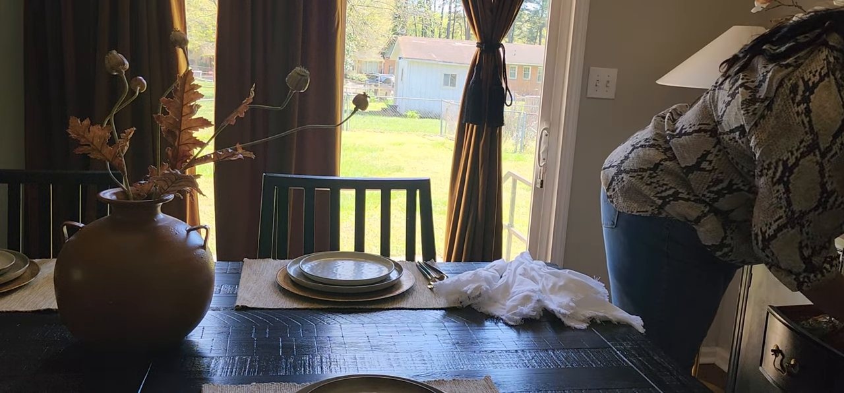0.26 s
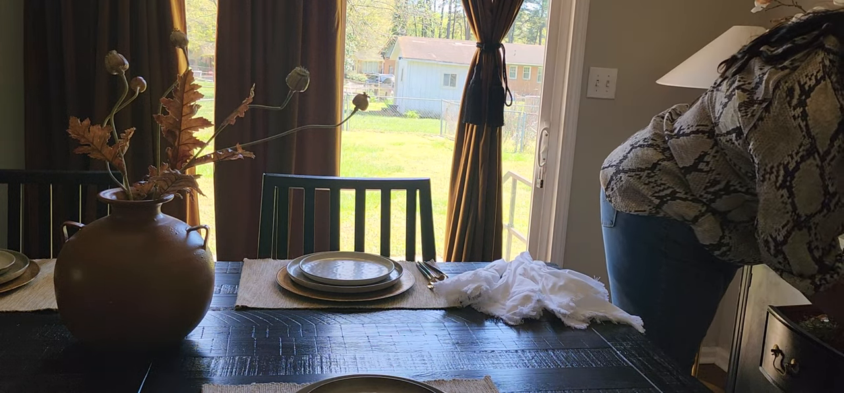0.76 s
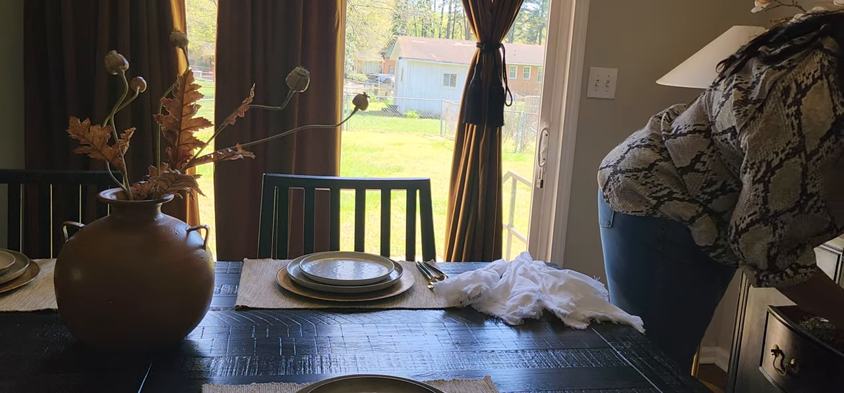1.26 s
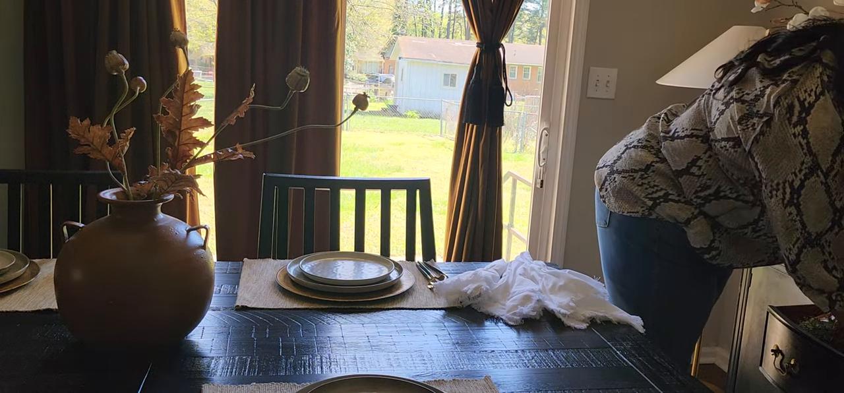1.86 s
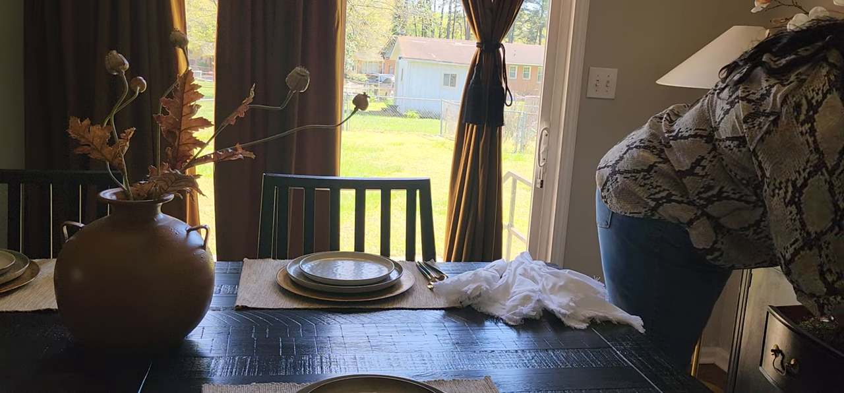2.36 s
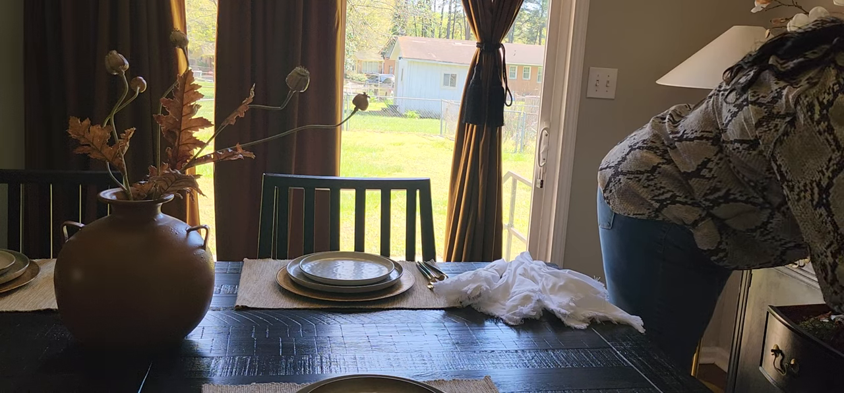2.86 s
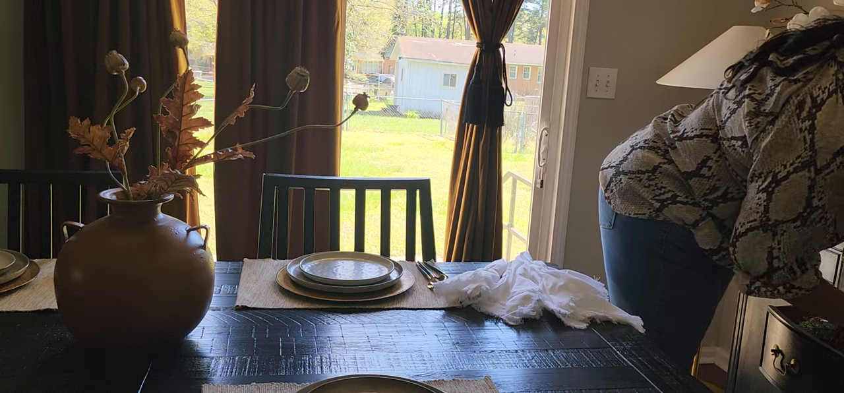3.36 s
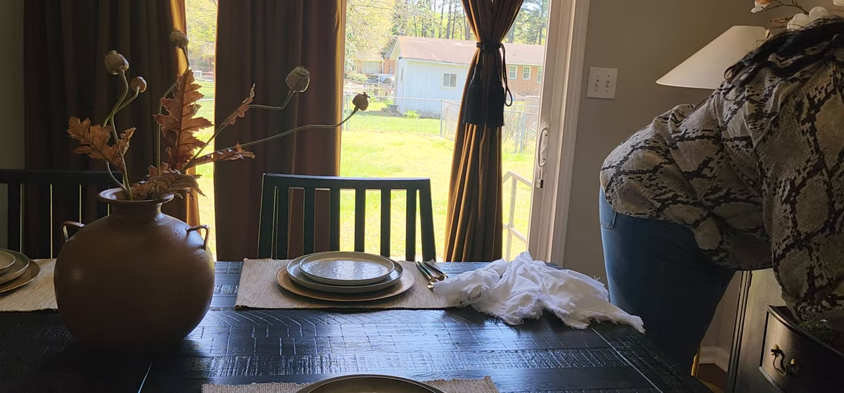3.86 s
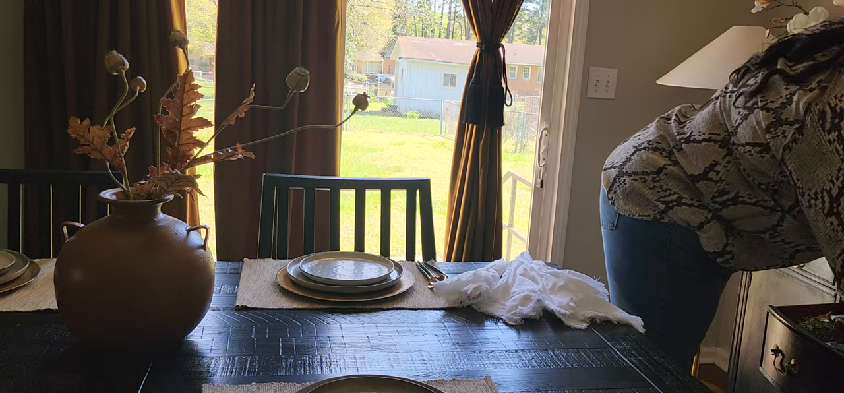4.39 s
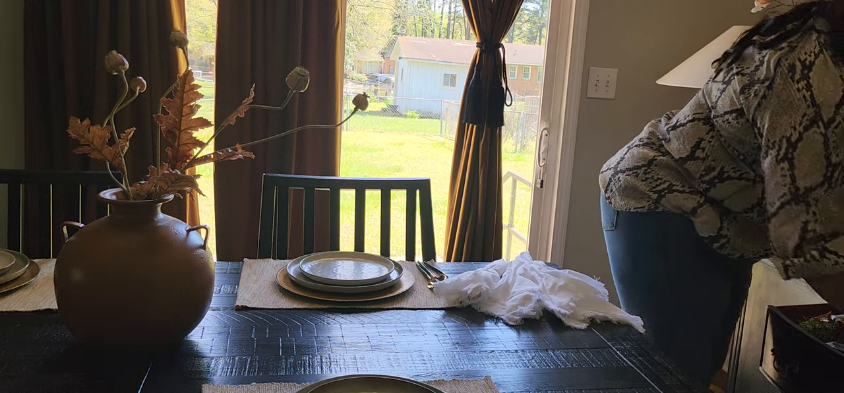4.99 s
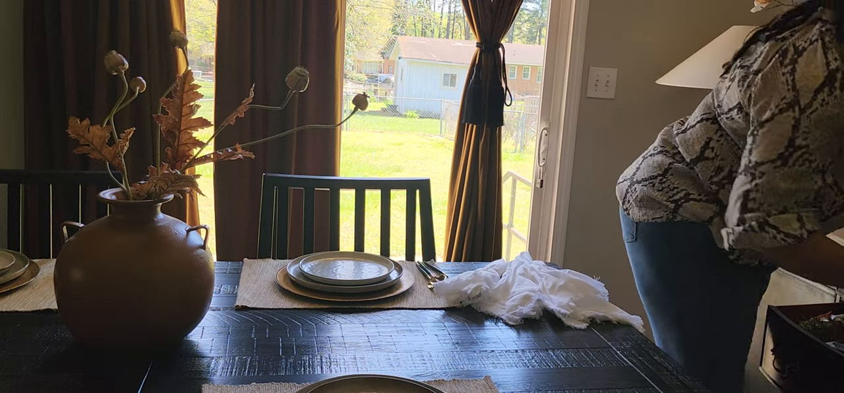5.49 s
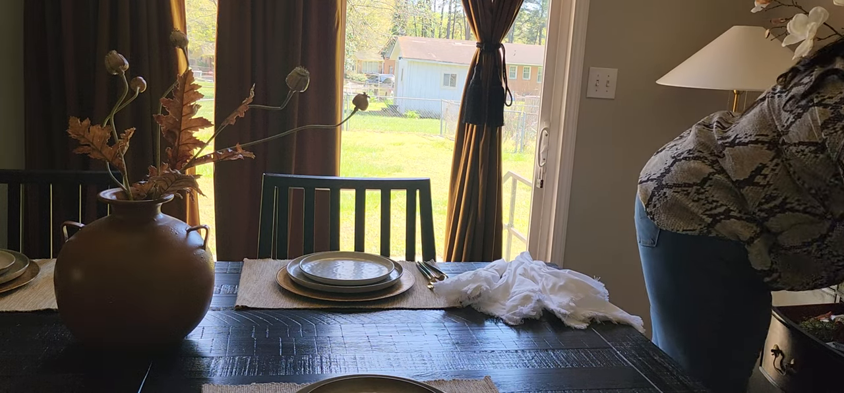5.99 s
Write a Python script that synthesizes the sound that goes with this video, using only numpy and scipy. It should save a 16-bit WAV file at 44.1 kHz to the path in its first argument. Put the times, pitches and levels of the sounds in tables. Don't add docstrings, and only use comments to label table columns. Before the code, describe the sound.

A quiet furnished dining room with low house rumble, faint hiss and short reverberation; a wooden drawer of forks sits a few metres away, slightly right. After a faint rustle, a bright, high fork clink with quick rebounds rings at 0.3 s, and wood bumps at 0.5. Near quiet, with a light drag and thin ringing around 1.15 and cloth rustle at 1.45. At 1.6 a fork drops with a duller clink and knock. Quiet again until 2.6, then forks drag and scrape, with a hard wooden bump at 2.85 and a faint panel groan. A firm knock and clink at 3.2 lead into irregular ticks and scrapes, thinning by 4.1. Bumps at 4.35-4.4 precede the loudest clattering snap at 4.5-4.6. A tiny clink follows at 4.8, then soft, dull footsteps from 4.9 to 5.75 with rustling sleeves and a faint creak at 5.4. A small rattling knock at 5.9 fades into quiet.

```python
import sys
import numpy as np
from scipy import signal
from scipy.fft import rfft, irfft
from scipy.io import wavfile
from scipy.ndimage import uniform_filter1d

SR = 44100
rng = np.random.default_rng(int(sys.argv[2]) if len(sys.argv) > 2 else 0)


def linear_from_db(decibels):
    return 10 ** (np.asarray(decibels, float) / 20)


def unload_audio(sound):
    columns = np.transpose(np.atleast_2d(sound))
    steps = np.round(np.clip(columns, -1, 1) * 32767)
    wavfile.write(sys.argv[1], SR, steps.astype(np.int16))


N = 275184

# start in seconds, ring level in dB, crack level in dB.
TINE_HITS = [
    (.2585, -44.5, -50),
    (.297, -16.5, -33),
    (.3045, -18, -49),
    (.3135, -35, -31.5),
]
DROP_HITS = [
    (1.606, -25.5, -28),
    (1.67, -58, -64),
]
PILE_HITS = [
    (3.246, -37, -32.5),
    (3.283, -55, -56),
    (3.381, -84, -64),
]
SNAP_HITS = [
    (4.502, -22, -46),
]
REST_HITS = [
    (4.776, -56.5, -66),
]
# frequency in Hz, level in dB, t60 in seconds.
TINE_MODES = [(3616, -31, 0.1), (5200, -21.5, 0.09), (6930, -11, 0.098), (7200, -8, 0.091),
              (8340, -8, 0.08), (9170, -6, 0.091), (10750, 0, 0.097), (11450, 3.5, 0.085),
              (12050, 1.5, 0.14), (12200, -1, 0.11), (13600, 0, .12), (14150, -5.5, .12),
              (15000, -11.5, 0.0945), (15450, 1, 0.11)]
DROP_MODES = [(662, 1, 0.061), (1270, -2.5, 0.12), (1555, 3, 0.049), (1703, 3, 0.04), (2090, -4.5, 0.077),
              (2570, -16, 0.081), (3310, -5.5, 0.028), (4240, -6, 0.04), (7300, -1, 0.081),
              (8650, -2.5, 0.12), (9340, 7.5, 0.088), (11320, 3.5, 0.08), (12100, -5, 0.062),
              (13600, -1, 0.08)]
PILE_MODES = [(1575, 15, 0.056), (2050, 17, 0.08), (2157, 16.5, 0.047), (2380, -9, 0.22), (3020, -6, 0.074),
              (3240, -0.5, 0.074), (3820, -3, 0.08), (5470, 11, 0.05), (5500, 3, 0.08), (6120, 5.5, 0.086),
              (6800, 3, 0.065), (10400, 9, 0.046), (12100, 1, 0.054), (13500, -9, .08)]
SNAP_MODES = [(1820, -30, .03), (2530, -18, .08), (4200, -6, 0.022), (5720, -8, 0.027), (7010, -4.5, 0.022),
              (7410, -4, 0.033), (8460, -26, .05), (9300, -24, .04), (11310, -7, 0.065), (12500, -12, .05),
              (13460, -10.5, .07)]
REST_MODES = [(2280, -1, .15), (2550, 8, 0.11), (2640, 5, 0.1), (3880, 0, 0.095), (5340, -1, 0.081),
              (7040, 6.5, 0.11), (11300, 5, 0.076)]
# start in seconds, level in dB.
TICKS = [(2.289, -64.5), (2.6656, -53), (2.798, -42), (3.195, -55), (3.209, -32), (3.313, -35.5),
         (3.3797, -38), (3.3973, -40), (3.5202, -49), (3.6182, -58.5), (3.658, -44.5), (3.78, -34.5),
         (3.866, -40)]

# start in seconds, length in seconds, strength in dB, weight on the panels in dB.
DRAGS = [(0.0, 0.075, -71.5, 6.5), (0.168, 0.062, -64, -0.5), (1.128, 0.082, -51.5, 6.5),
         (2.583, 0.21, -67, 4), (2.71, 0.078, -44, -6), (2.779, 0.05, -31.5, -8), (2.882, 0.044, -40, -5),
         (2.917, 0.065, -48, -12), (3.267, 0.039, -43.5, 4.5), (3.29, .11, -41.5, -7.5),
         (3.437, 0.13, -53.5, -18), (3.735, 0.043, -44.5, 1.5), (3.851, 0.037, -50, 1.5),
         (3.968, 0.13, -62, 7.5), (4.245, 0.051, -64, -8)]
# start in seconds, length in seconds, strength in dB, sizzle in dB, tine pitch in Hz.
SCRAPES = [(1.131, 0.079, -65, -14.5, 4400), (2.586, 0.051, -65.5, -18, 1490),
           (2.721, 0.099, -51.5, -23.5, 2450), (2.77, 0.12, -51, -33, 3480),
           (2.91, 0.067, -40.5, -20, 6800), (2.978, 0.067, -48, -16, 2900), (3.174, 0.032, -47, -12, 5040),
           (3.286, 0.059, -45, -19, 2800), (3.365, 0.051, -42.5, -18.5, 3340),
           (3.491, 0.031, -56.5, -33, 4020), (3.72, 0.061, -49.5, -19, 2640),
           (3.847, 0.037, -46, -8.5, 2630), (3.944, 0.062, -48, -10.5, 4560),
           (4.009, 0.046, -53.5, -12.5, 1750), (4.05, 0.032, -61, -12, 4600),
           (4.163, 0.079, -77, -29, 2100), (4.276, 0.076, -70.5, -25.5, 2200),
           (5.618, 0.061, -68, -30, 2800)]
# frequency in Hz, level in dB.
STEEL_TONE = [(1200, 4), (1500, 2), (3000, -4), (5000, -3), (7500, -1), (9000, -7.5)]
CHATTER_HZ = [1640, 2205, 3270, 4550, 5660]

# start in seconds, strength in dB, weight of the low thud in dB, hardness of the edge in dB.
KNOCKS = [(0.299, -57, -3.5, -20), (0.839, -74, 8.5, -7), (1.604, -35.5, -7, -2.5), (1.656, -38, -2.5, -5),
          (1.948, -80.5, 15, -16.5), (2.588, -59, -3, -7.5), (3.211, -29, -2, -13.5),
          (3.246, -39.5, 1.5, 11), (3.553, -48.5, -12, -23), (3.754, -49, -2, -23), (4.033, -59, 2, 9.5),
          (4.503, -37, -15.5, -3), (4.537, -18, -16.5, -1), (4.596, -29.5, -10.5, -7.5),
          (5.885, -39, -7, -28), (5.895, -38, -8.5, -11), (5.928, -41.5, -13, -11)]
BUMPS = [
    (0.477, -36, -7, 2.5),
    (2.841, -30, -15, -1.5),
    (4.35, -39, -3.5, 4.5),
    (4.404, -33, -3, -6),
]
STEPS = [
    (4.893, -37.5, -17, -17),
    (4.904, -36, -4.5, -4),
    (5.077, -47.5, 2, -20),
    (5.213, -46, 6, -5.5),
    (5.239, -51.5, -12, -15),
    (5.338, -49.5, 3.5, -0.5),
    (5.539, -47.5, -4.5, -6.5),
    (5.577, -45, -4, -33),
    (5.75, -51, 3, -24),
]
# low edge in Hz, high edge in Hz.
DRAWER_HZ = [(400, 1100), (120, 400), (1100, 2800), (2800, 7000)]
BUMP_HZ = [(400, 1100), (120, 400), (1100, 2400), (2400, 8000)]
FLOOR_HZ = [(300, 600), (130, 300), (600, 1700), (1700, 5000)]
# frequency in Hz, level in dB, t60 in seconds.
BOX = [(130.3, 1.5, 0.036), (228, -11, 0.18), (246, -16, 0.2), (303, -8.5, 0.11), (483, -5, 0.033),
       (637.6, -19.5, 0.016), (674, -26, 0.22), (716, -1, 0.017), (816, -5.5, 0.029), (969, -5, 0.049),
       (1062, -54.5, 0.0654), (1318, -13, 0.081)]
# start in seconds, level in dB, centre in Hz.
TAPS = [(0.4767, -31.5, 4200), (0.4826, -37, 3180), (0.4974, -42, 1090), (1.605, -34.5, 1000),
        (1.636, -38, 900), (2.7415, -45.5, 2800), (2.8027, -38, 1200), (2.8145, -36, 1250),
        (2.845, -31.5, 1310), (2.841, -42, 3800), (2.9418, -40, 1150), (2.9476, -32.5, 1100),
        (2.96, -34, 1400), (3.0, -42, 2400), (3.2153, -29, 1090), (3.2486, -30, 1600), (3.311, -42, 3620),
        (3.3803, -39, 3400), (3.402, -38, 3700), (3.5211, -48, 4100), (3.7416, -50, 2660),
        (3.7792, -42, 1150), (3.8723, -44, 1200), (3.9702, -44, 4600), (4.0342, -43.5, 1700),
        (4.3509, -34, 2200), (4.356, -40, 3000), (4.412, -38, 1500), (4.406, -35, 1100),
        (4.5379, -21, 3100), (4.5434, -19.5, 1310), (4.5456, -27, 3000), (4.576, -32, 2800),
        (4.6686, -35, 1200), (4.894, -39, 702), (4.904, -49, 2200), (5.2156, -51, 1500), (5.338, -50, 700),
        (5.754, -54, 590), (5.896, -53, 2200), (3.7528, -47, 1100), (1.606, -36, 3300), (5.54, -51.5, 1500),
        (5.578, -49.5, 690), (5.893, -42, 900)]
# start in seconds, end in seconds, start pitch in Hz, end pitch in Hz, level in dB.
GROANS = [
    (2.852, 3.048, 232, 221, -47),
    (5.402, 5.53, 262, 221, -55),
]

# start in seconds, level in dB, t60 in seconds.
NUDGES = [(1.136, -68.5, 0.51), (1.19, -66, 0.21), (1.146, -61.5, 0.28), (1.196, -60.5, 0.23),
          (1.215, -61.5, .3), (1.27, -66, 0.85), (2.853, -37, 0.17), (3.47, -52.5, 0.35),
          (3.555, -47, 0.32), (3.214, -34, 0.2), (5.892, -38, 0.17), (4.538, -19.5, 0.12),
          (4.538, -21.5, 0.075), (3.213, -47, .12), (3.765, -50, 0.16), (4.035, -49, .12),
          (5.755, -58, 0.14), (3.7, -48, .2), (4.9, -42.5, 0.29), (4.0, -55, .3), (3.283, -43, .1),
          (3.4, -50, 0.14), (3.3, -58, .15), (4.175, -70, 0.29), (2.845, -36, 0.089), (5.215, -45, .15),
          (5.58, -46.5, 0.18), (3.9, -48, .12), (.478, -41.5, 0.1), (1.678, -51, 0.21), (3.215, -37, .1),
          (1.607, -39, 0.072), (4.78, -65, .25), (4.78, -60.5, 0.23), (1.608, -34, 0.13), (1.67, -41, .12),
          (1.625, -46, 0.31), (1.635, -41.5, 0.21), (3.22, -43, .2), (4.41, -43, .15), (2.95, -42, .15),
          (5.8, -50, 0.28), (5.58, -54.5, .25), (4.556, -31, .3), (4.352, -44, .08), (.479, -44, .06),
          (4.51, -44, .1)]
NUDGE_HZ = [4366, 4366, 7700, 6971, 1707, 1448, 1620, 760, 720, 105, 110, 684, 1240, 215, 680, 1780, 620,
            140, 540, 125, 2030, 3300, 2700, 1620, 1200, 430, 400, 980, 2100, 2570, 280, 3300, 2620, 3950,
            1610, 1660, 235, 560, 200, 640, 1120, 340, 330, 640, 2150, 2150, 760]
# frequency in Hz, level in dB, t60 in seconds.
CLINK = [(4818, -11, 0.2), (5184, -5.5, 0.12), (6013, -11.5, 0.33), (6918, 0, 0.31), (7160, -4, 0.42),
         (7574, -3, 0.16), (7650, -1, 0.15), (8048, -5, 0.12), (8400, -1, 0.12), (8516, -10, 0.19),
         (8662, -8, 0.25), (8888, -7, 0.21), (9200, -5, 0.15)]
CLINK_LOW = [(3560, -12, .2), (3690, -10, .3), (3994, -13, .2), (4156, -6, .1), (4330, -9, .14),
             (4470, -9, .2), (4650, -10, .15), (5080, -8, .12), (5432, -2, .05), (5868, -8, .13),
             (6200, -8, .17), (6450, -8, .17)]
CRASH = [(1360, 2, 0.061), (1577, -16.5, 0.68), (1800, -4, 0.18), (1850, -9.5, 0.37), (2210, -4.5, 0.21),
         (3203, -11, 0.26), (3278, -19, 0.39), (3817, -9, 0.14), (4100, -8, 0.13), (5380, -28, 0.6),
         (5636, -3, 0.042), (6239, -21, 0.38)]

# start in seconds, length in seconds, sleeve in dB, shoe in dB.
SWISHES = [(0.0, 0.076, -79, -76), (.07, 0.065, -74, -68.5), (.2, 0.11, -65, -73), (.74, 0.097, -79.5, -72),
           (1.43, 0.096, -70.5, -65), (1.52, 0.083, -67, -66), (1.95, 0.059, -72.5, -88),
           (2.26, 0.052, -77.5, -91), (2.48, 0.13, -80.5, -91), (4.26, 0.078, -77, -78.5),
           (4.74, 0.034, -68, -53), (5.01, 0.13, -69, -64.5), (5.1, 0.095, -63.5, -59),
           (5.2, 0.16, -69.5, -61), (5.27, 0.11, -85, -55), (5.37, 0.1, -66, -77), (5.54, 0.099, -75, -68),
           (5.62, 0.11, -76, -64), (5.75, 0.068, -77, -68.5), (5.89, 0.024, -73, -68),
           (6.07, .2, -72.5, -97.5)]
# frequency in Hz, level in dB.
CLOTH_TONE = [(2000, -5.5), (3500, -8.5), (5000, 1), (7500, 5.5), (10000, 5.5), (13000, 2), (16000, -10.5)]
# start in seconds, length in seconds, level in dB.
THUMPS = [(2.0, 0.035, -55.5), (2.58, 0.046, -61), (2.75, 0.11, -60), (3.19, 0.048, -63), (3.53, 0.16, -47),
          (4.39, .08, -61), (4.75, 0.08, -59), (4.89, 0.021, -47), (5.15, .12, -53), (5.32, 0.034, -39),
          (5.45, 0.41, -56.5), (6.08, 0.087, -68.5)]
# frequency in Hz, density in dB per Hz.
RUMBLE_TONE = [(10, -39.5), (20, -12.5), (40, -0.5), (56, 3.5), (75, -8), (120, -11.5), (160, -22),
               (280, -25), (400, -38.5), (800, -74.5)]
HISS_TONE = [(150, -30), (250, 0), (510, -8), (686, -5.5), (2910, -15), (4260, -12), (5930, -17),
             (7440, -8), (8550, -14), (9830, -48), (11300, -22), (13200, -21.5), (16000, -18)]

# t60 in seconds, level in dB, likeness of the ports from 0 to 1.
ROOM = [(0.44, 3, 1), (0.39, 1.5, 0.97), (0.41, 1, 0.75), (0.4, 5.5, 0.4), (0.35, 3.5, 0), (0.36, 0, 0),
        (0.2, -0.5, 0), (0.16, -1.5, 0)]
ROOM_HZ = [120, 245, 500, 1020, 2050, 4100, 7400, 13000]
# frequency in Hz, level in dB.
PORT = [(100, 0), (6000, 0.23), (7300, -2.5), (8800, -8.5), (9900, -17.5), (11000, -15.5), (12500, -7.5),
        (16000, -17.5)]
# frequency in Hz, left minus right in dB.
LEAN = [(60, 1), (150, 2), (400, 1), (1400, 0), (3000, -1), (5500, -4.5), (10000, -3), (14000, -2)]


def steel():
    rings, cracks = np.zeros(N), np.zeros(N)
    t = np.arange(2600) / SR
    kinds = ((TINE_HITS, TINE_MODES), (DROP_HITS, DROP_MODES), (PILE_HITS, PILE_MODES),
             (SNAP_HITS, SNAP_MODES), (REST_HITS, REST_MODES))
    for hits, modes in kinds:
        for s, ring_db, crack_db in hits:
            shape = np.exp(-t / 0.0089) * np.minimum(t / 0.0017, 1)
            add(cracks, s, linear_from_db(crack_db) * rng.standard_normal(len(t)) * shape)
            chance = rng.standard_normal((len(modes), 4, 3))
            for (hz, db, t60), forks in zip(modes, chance):
                for detune, share, turn in forks:
                    fork_hz = hz * (1 + .007 * detune) + 14 * detune
                    add(rings, s, ring(fork_hz, ring_db + db - 12 + 2.5 * share, t60, turn))
    for s, db in TICKS:
        add(cracks, s, linear_from_db(db + 4) * rng.standard_normal(len(t)) * np.exp(-t / 0.003))
    return rings + band(cracks, (2900, 15500))


def slides():
    attack_s, release_s = 0.026, 0.15
    jerks = walk(45)
    panels = unit(band(band(box(grains(1.3), 0), (190, 330)), (180, 350))) * linear_from_db(0.66 * jerks - 5.0)
    wood = unit(band(band(box(grains(3.36), 0), (430, 1350)), (380, 1350))) * linear_from_db(jerks - 6.0)
    drag = unit(colour(grains(1.8), STEEL_TONE + [(12000, -12.5)]))
    drag *= linear_from_db(jerks + 2.04 * walk(90) - 3.0)
    touch = grains(3.85)
    for hz in CHATTER_HZ:
        drag += unit(band(touch, (hz * 0.921, hz * 1.075))) * linear_from_db(-17.5 + 1.5 * walk(16))
    sizzle = unit(band(grains(1.2), (9000, 15800))) * linear_from_db(1.34 * jerks + 12.5)

    drag_rows = [(s, length, db + weight_db, db) for s, length, db, weight_db in DRAGS]
    on_wood = strokes(drag_rows, attack_s=0.037, release_s=0.12)
    scrape_rows = [(s, length, db, db + sizzle_db) for s, length, db, sizzle_db, _ in SCRAPES]
    on_steel = strokes(scrape_rows, attack_s, release_s)

    sing = np.zeros(N)
    for s, length, db, _, hz in SCRAPES:
        part = slice(int(s * SR), int((s + length + release_s) * SR))
        gain = strokes([(s, length, db - 10)], attack_s, release_s)[0, part]
        sing[part] += unit(band(touch[part], (hz / 1.12, hz * 1.12))) * gain
    return np.sum(on_wood * [panels, wood] + on_steel * [drag, sizzle], axis=0) + sing * linear_from_db(1.5 * jerks)


def knocks(blows, edges, crack_db):
    rattle_s, shorter_db_per_db, usual_db = 0.0099, 0.22, -37.5
    first_db = 14.5
    out = np.zeros(N)
    t = np.arange(int(.18 * SR)) / SR
    pushes = [band(1. * (t == 0), e) for e in edges]
    pushes = [push / np.sqrt(np.sum(push ** 2)) for push in pushes]
    for s, strength_db, weight_db, hard_db in blows:
        length = rattle_s * linear_from_db(-shorter_db_per_db * (strength_db - usual_db))
        shape = np.exp(-t / np.clip(length, .002, .06)) * np.minimum(t / 0.0011, 1)
        levels_db = strength_db + np.array([0, weight_db, hard_db, crack_db + 0.7 * hard_db])
        parts = []
        for db, e, push in zip(levels_db, edges, pushes):
            bounces = linear_from_db(db) * unit(band(rng.standard_normal(len(t)), e)) * shape
            parts.append(bounces + linear_from_db(db + first_db) * push)
        parts[0] = band(parts[0], (edges[0][0] * .8, 4000))
        add(out, s, box(sum(parts), 1.2))
    return out


def box(x, spread_db):
    out = x.copy()
    for (hz, db, t60), (detune, share) in zip(BOX, rng.standard_normal((len(BOX), 2))):
        r = np.exp(-np.log(1000) / (t60 * SR))
        pole = r * np.exp(2j * np.pi * hz * (1 + .02 * detune) / SR)
        mode = signal.lfilter([1], [1, -pole], x).imag
        out += linear_from_db(db - 15 + spread_db * share) * np.sqrt(1 - r) * mode
    return out


def contacts():
    out = np.zeros(N)
    click = 1. * (np.arange(400) == 0)
    for s, db, hz in TAPS:
        push = band(click, (hz / 1.5, hz * 1.5))
        add(out, s, linear_from_db(db + 5) * push / np.abs(push).max())
    return out


def groans():
    out, wobble = np.zeros(N), walk(43.6)
    t = np.arange(N) / SR
    for start, end, hz0, hz1, db in GROANS:
        hz = np.interp(t, (start, end), (hz0, hz1)) * (1 + 0.01105 * wobble)
        swell = np.clip(np.minimum(t - start, end - t) / 0.024, 0, 1)
        out += linear_from_db(db + 3.7 * walk(34.47)) * swell * np.sin(2 * np.pi * np.cumsum(hz) / SR)
    return out


def nudges():
    clink_s, clink_db, clink_low_db = .298, -43.5, -50.5
    crash_s, crash_db = 4.538, -30
    out = np.zeros((2, N))
    rings = [(hz, *row) for hz, row in zip(NUDGE_HZ, NUDGES)]
    rings += [(hz, clink_s, clink_db + db, t60) for hz, db, t60 in CLINK]
    rings += [(hz, crash_s, crash_db + db, min(t60, .3)) for hz, db, t60 in CRASH]
    rings += [(hz, clink_s, clink_low_db + db, t60) for hz, db, t60 in CLINK_LOW]
    for count, (hz, s, db, t60) in enumerate(rings):
        turn = rng.random() * (count >= len(NUDGES))
        add(out[0], s, ring(hz, db, t60, turn))
        add(out[1], s, ring(hz, db, t60, turn + min(hz / 8000, .12)))
    return out


def cloth():
    rustle = unit(colour(grains(1.4), CLOTH_TONE)) * linear_from_db(2.2 * walk(43) + 7.0)
    shuffle = unit(band(grains(1.8), (800, 2600))) * linear_from_db(0.78 * walk(25) - 6.5)
    return np.sum(strokes(SWISHES, attack_s=0.031, release_s=0.27) * [rustle, shuffle], axis=0)


def house():
    mid, side = (unit(colour(rng.standard_normal(N), RUMBLE_TONE)) for _ in range(2))
    level = np.hypot(linear_from_db(-61), strokes(THUMPS, attack_s=0.032, release_s=0.32)[0])
    return (mid + 0.14 * side * np.array([[1], [-1]])) * level


def room(x):
    t = np.arange(int(.7 * SR)) / SR
    taps = np.zeros((2, len(t)))
    for hz, (t60, db, alike) in zip(ROOM_HZ, ROOM):
        edges = (hz / 1.41, min(hz * 1.41, 18000))
        mid, side = (band(rng.standard_normal(len(t)), edges) for _ in range(2))
        pair = np.sqrt(1 + alike) * mid + np.sqrt(1 - alike) * side * np.array([[1], [-1]])
        pair *= linear_from_db(-60 * t / t60) * np.clip(t / 0.00083, 0, 1)
        taps += linear_from_db(db) * pair * np.sqrt(hz / SR / np.sum(pair ** 2, axis=1, keepdims=True))
    taps[:, 0] = 0.7
    taps[0] = np.roll(taps[0], 12)
    power = np.abs(rfft(taps)) ** 2
    even = np.sqrt(uniform_filter1d(power, size=700) / uniform_filter1d(power, size=70))
    treble = np.clip(np.arange(len(even[0])) / 240 - 1, 0, 1)
    taps = irfft(rfft(taps) * even ** treble)[:, :-2000]
    return np.array([signal.fftconvolve(x, h)[:N] for h in taps])


def ring(hz, db, t60, turn):
    t = np.arange(int(min(t60, 1) * SR)) / SR
    return linear_from_db(db - 60 * t / t60) * np.sin(2 * np.pi * (hz * t + turn)) * np.minimum(t / .0012, 1)


def grains(scatter_db):
    return unit(rng.standard_normal(N) * linear_from_db(scatter_db * rng.exponential(size=N)))


def strokes(rows, attack_s, release_s):
    power = np.zeros((len(rows[0]) - 2, N))
    for start, length, *levels_db in rows:
        t = np.arange(int((length + release_s) * SR)) / SR
        shape = np.minimum(t / attack_s, 1) ** 2 * linear_from_db(-60 * np.maximum(t - length, 0) / release_s)
        for track, db in zip(power, levels_db):
            add(track, start, (linear_from_db(db) * shape) ** 2)
    return np.sqrt(power)


def walk(rate):
    k = int(SR / rate)
    steps = np.repeat(rng.standard_normal(N // k + 1), k)
    return unit(uniform_filter1d(uniform_filter1d(steps, k), k)[:N])


def colour(x, table, share=1):
    hz, db = np.transpose(table)
    grid = np.maximum(np.arange(2049) * SR / 4096, 1)
    level_db = share * np.interp(np.log(grid), np.log(np.maximum(hz, 1)), db)
    cep = irfft(np.log(linear_from_db(level_db)))
    cep[1:2048] *= 2
    cep[2049:] = 0
    taps = irfft(np.exp(rfft(cep)))
    return signal.fftconvolve(x, taps)[:len(x)]


def band(x, edges):
    return signal.sosfilt(signal.butter(2, edges, "bandpass", fs=SR, output="sos"), x)


def unit(x):
    return x / np.sqrt(np.mean(x ** 2))


def add(track, s, x):
    i = int(s * SR)
    track[i:i + len(x)] += x[:N - i]


def scene():
    drawer = room(steel() + slides())
    blows = knocks(KNOCKS, DRAWER_HZ, crack_db=-5) + knocks(BUMPS, BUMP_HZ, crack_db=-19.5)
    cabinet = room(blows + groans() + contacts())
    floor = room(knocks(STEPS, FLOOR_HZ, crack_db=-17.5) + cloth())
    return drawer + cabinet + floor + nudges() + house()


def low_pass(x):
    return signal.sosfilt(signal.butter(12, 16610, fs=SR, output="sos"), x)


def record(dry):
    ports = [colour(colour(x, PORT), LEAN, side / 2) for x, side in zip(dry, (1, -1))]
    hiss = [unit(colour(rng.standard_normal(N), HISS_TONE)) * linear_from_db(-70.5) for _ in ports]
    top = signal.ellip(10, .3, 70, 15790, fs=SR, output="sos")
    mix = signal.sosfilt(top, np.array(ports) + hiss)
    return low_pass(mix)


dry = scene()
out = record(dry)
unload_audio(out)
```